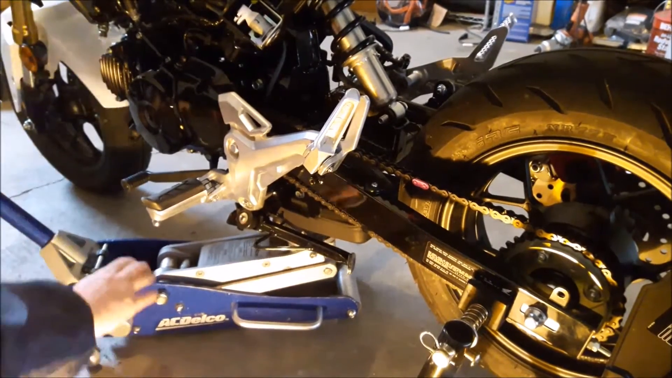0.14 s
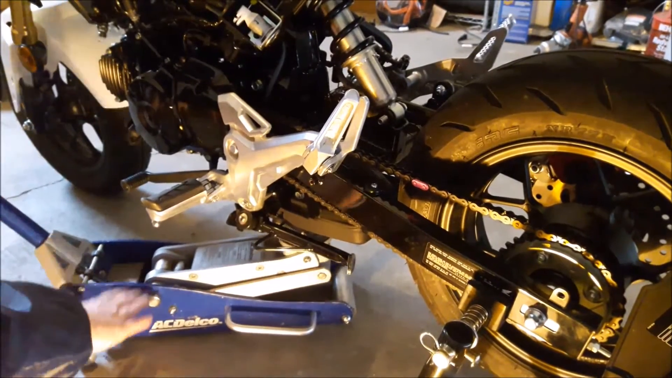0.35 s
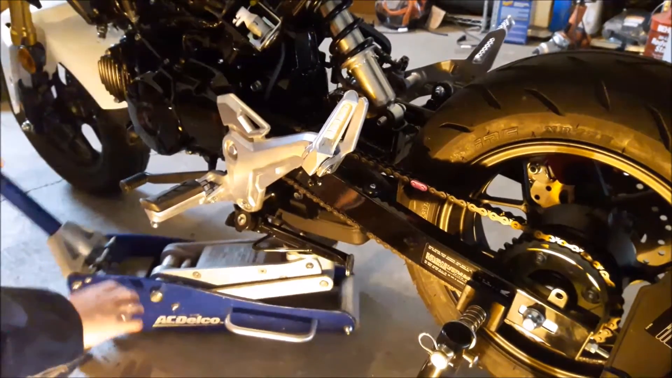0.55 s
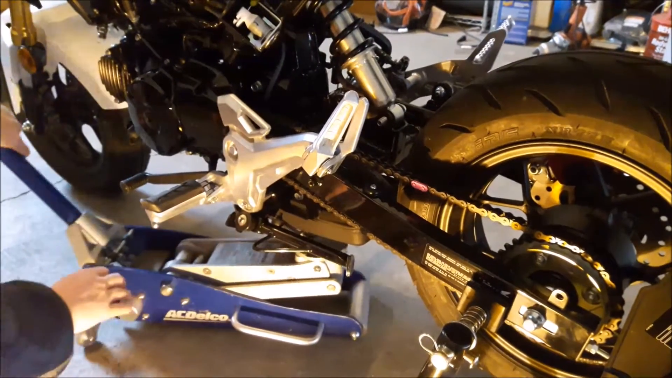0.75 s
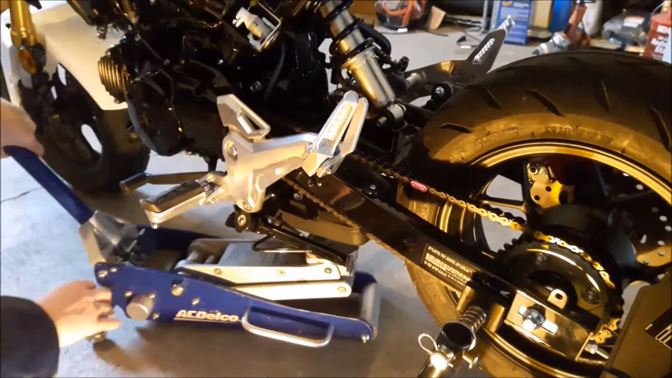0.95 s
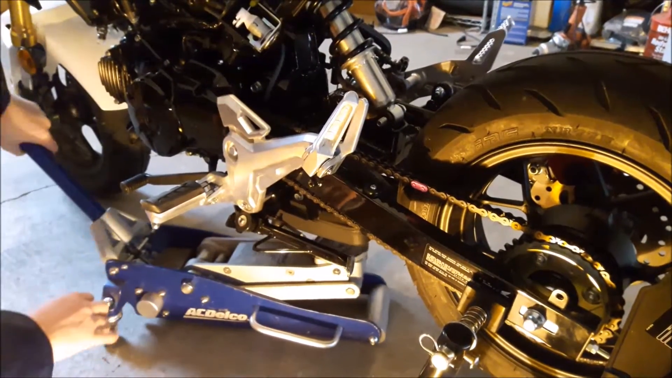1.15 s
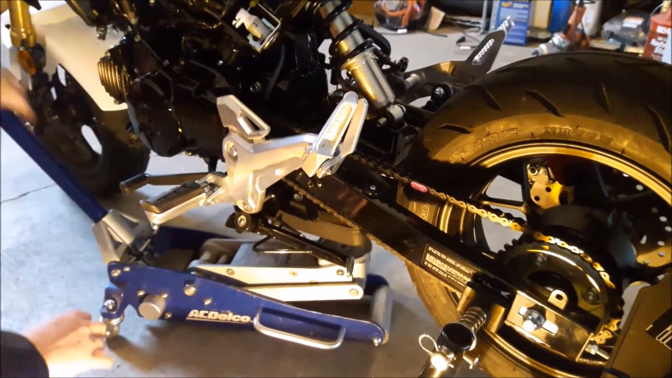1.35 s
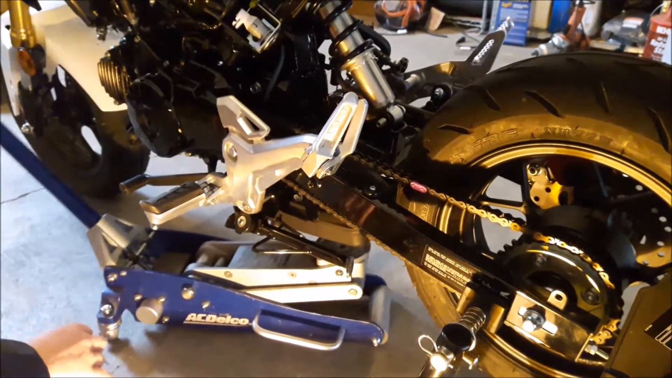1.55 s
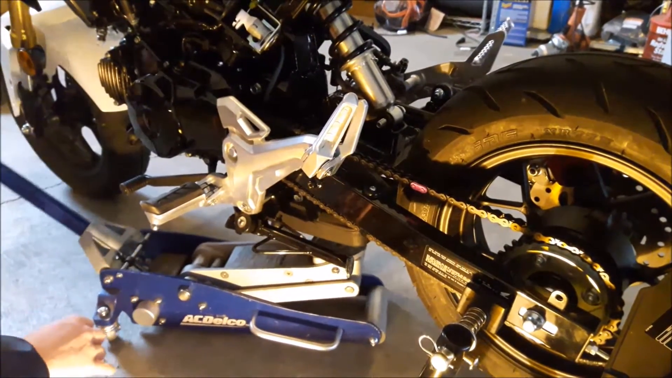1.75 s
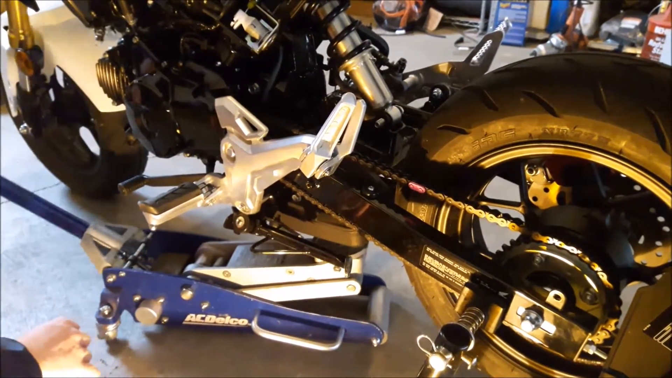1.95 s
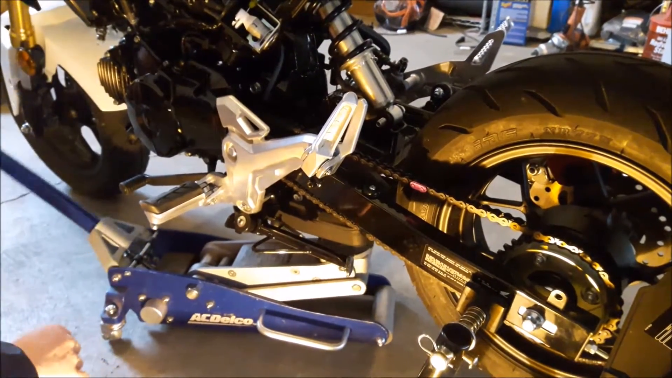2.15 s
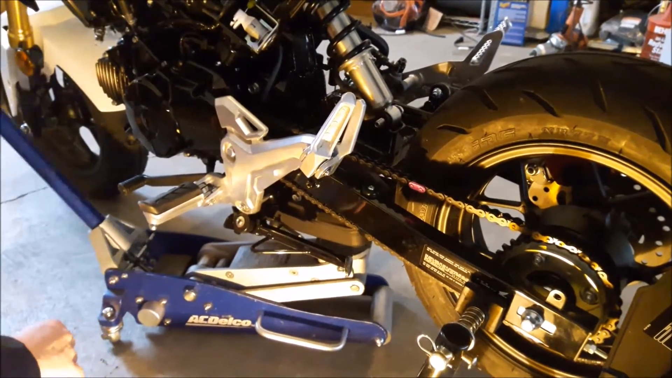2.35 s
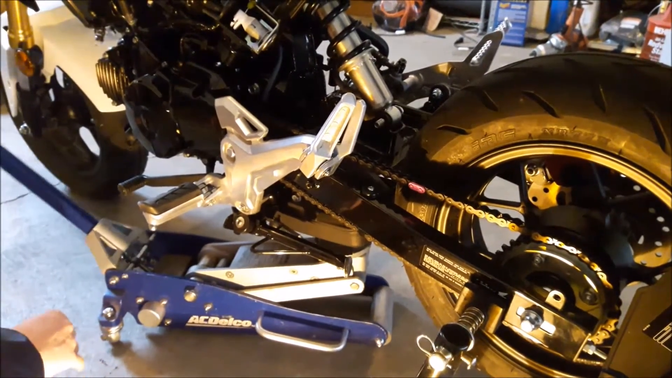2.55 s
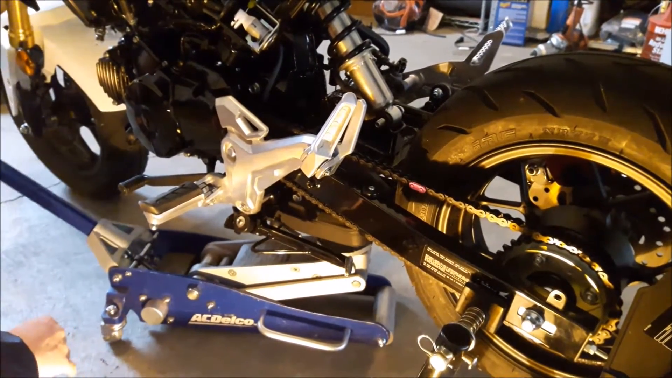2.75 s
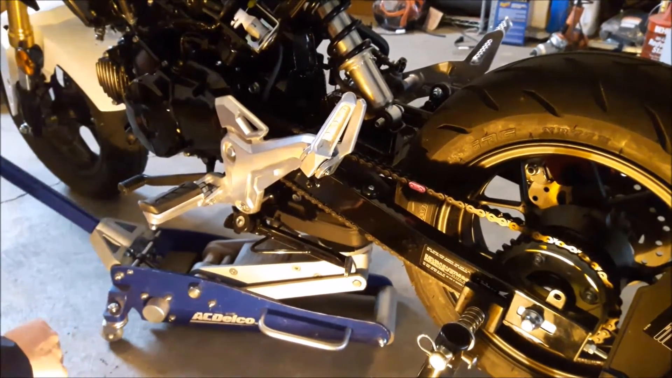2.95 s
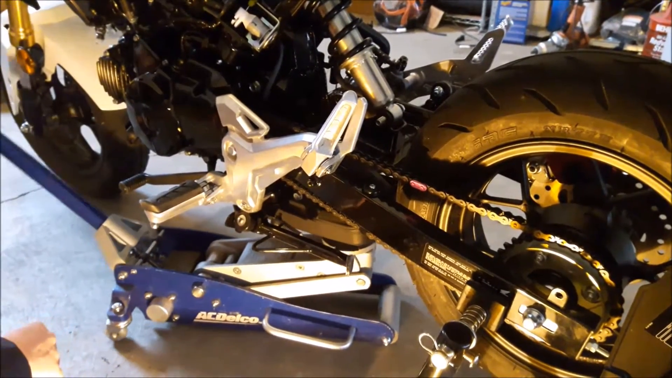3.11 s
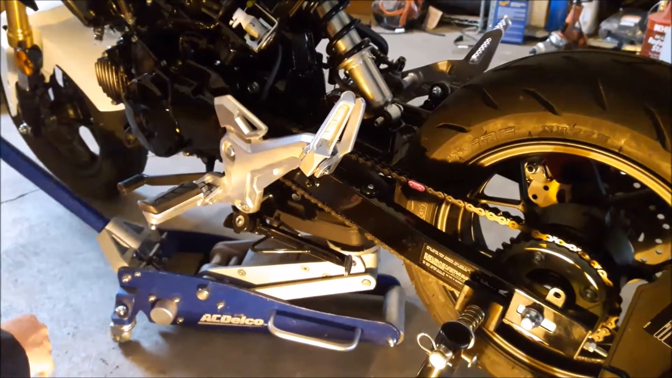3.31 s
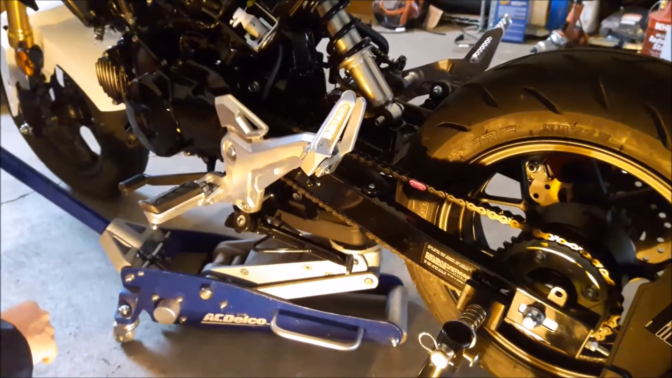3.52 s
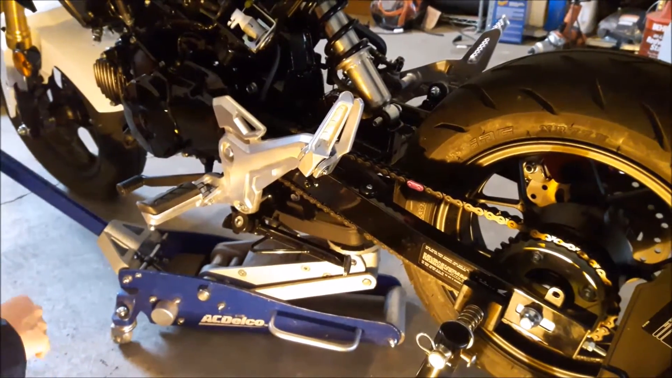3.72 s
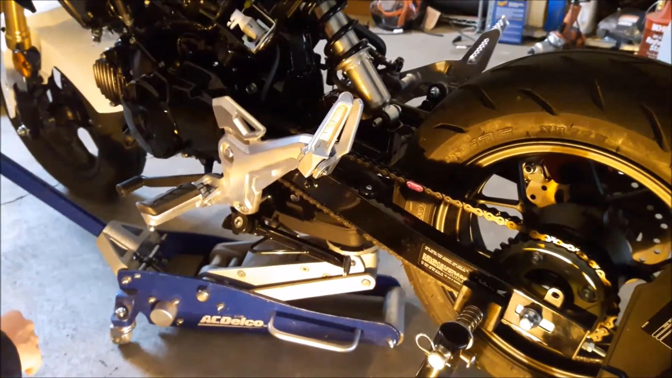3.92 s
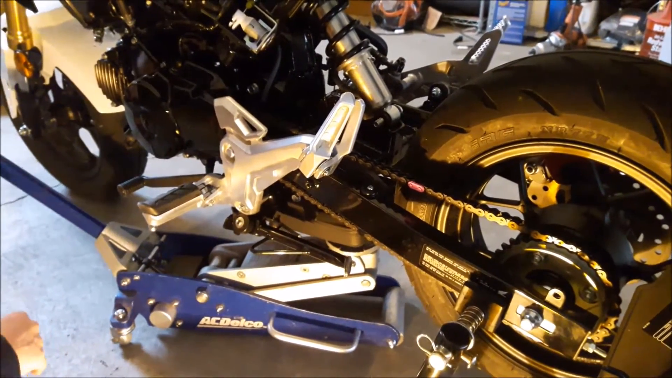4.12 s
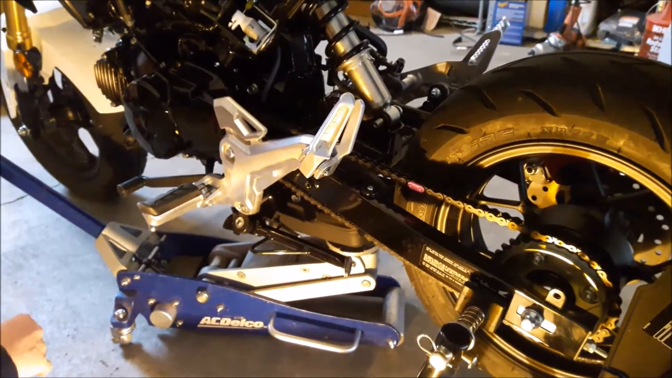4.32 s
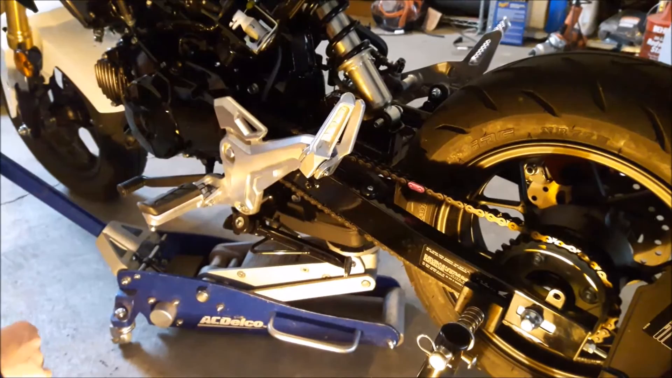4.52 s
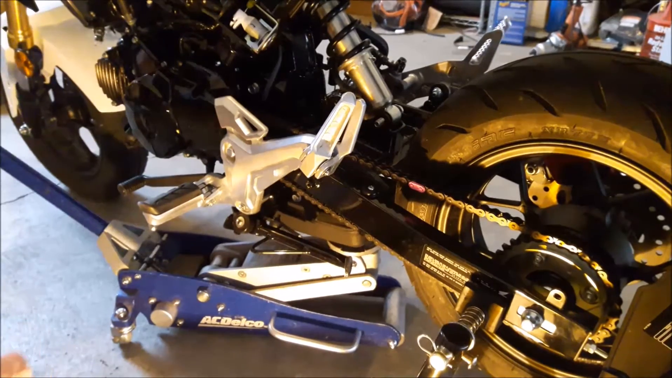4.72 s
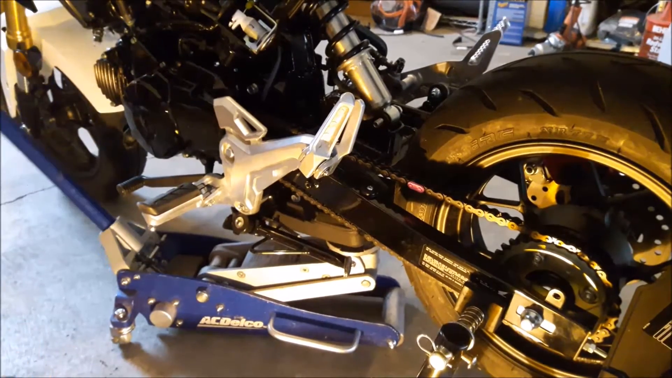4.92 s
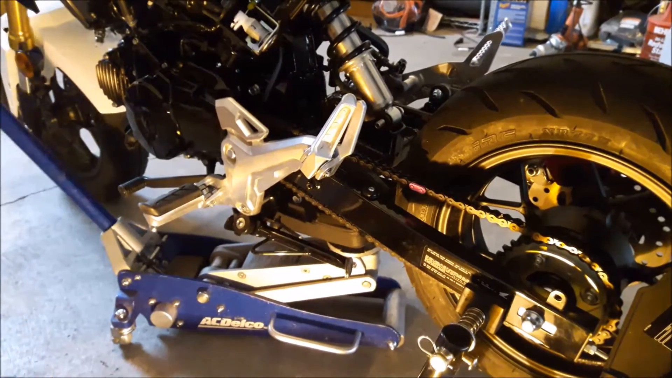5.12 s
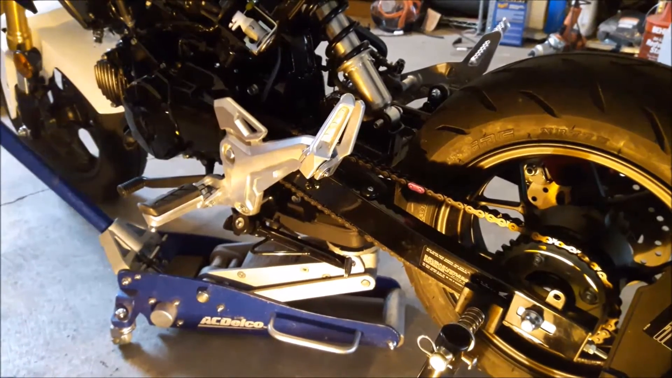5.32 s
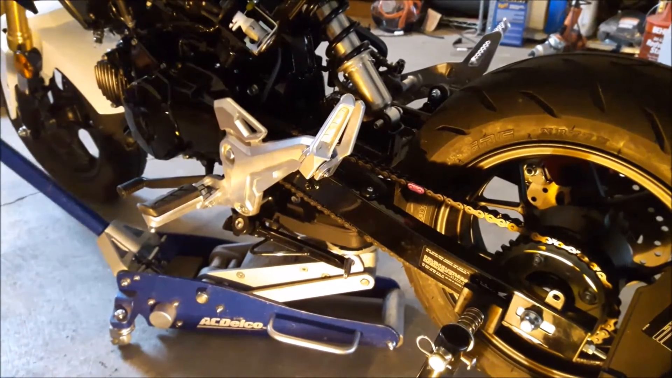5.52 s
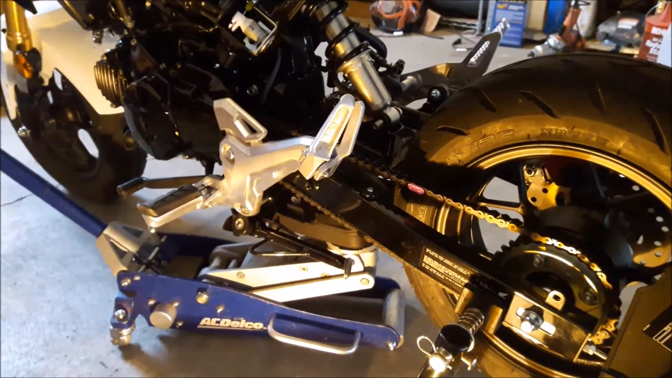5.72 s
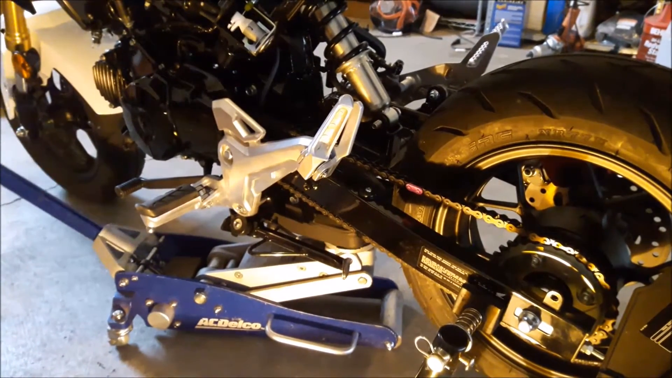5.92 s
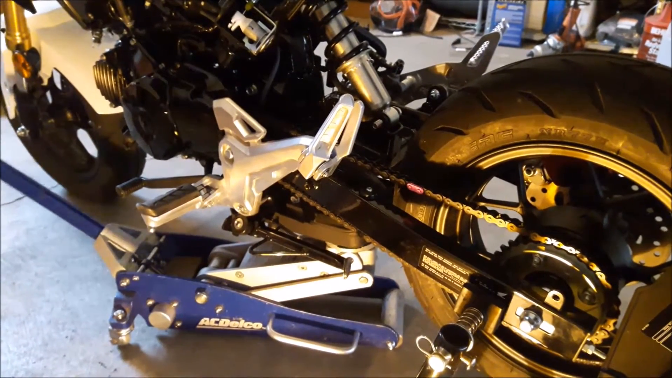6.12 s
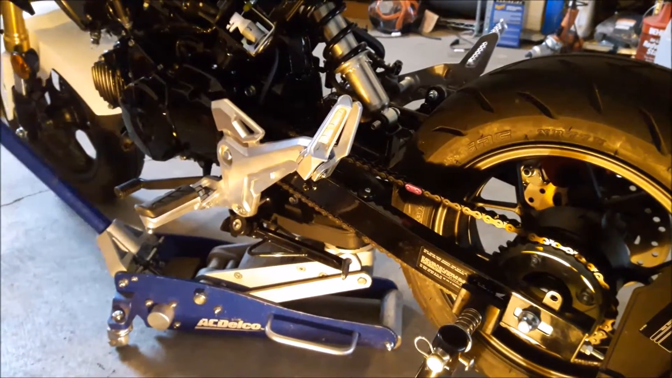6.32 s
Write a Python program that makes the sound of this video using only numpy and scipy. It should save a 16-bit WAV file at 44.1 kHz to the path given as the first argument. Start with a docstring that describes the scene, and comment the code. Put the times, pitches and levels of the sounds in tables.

```python
"""In a small hard garage a steel floor jack is rolled over concrete under a motorcycle, then pumped.
First a caster scuffs and the wheels rumble and grind, made of filtered noise and tiny impacts; the dry axle
sings and squeals as unsteady high tones, and the frame knocks as short bursts of force ring its resonances.
Then the handle clunks in its socket in the same way, while the pivot scrapes and squeaks, the chassis booms
and the ram slides faintly. Air murmurs throughout, and dense reflections ring after every sound of the jack."""
import sys
import numpy as np
from scipy import signal
from scipy.fft import rfft, irfft
from scipy.io import wavfile

SR = 44100
rng = np.random.default_rng(int(sys.argv[2]) if len(sys.argv) > 2 else 0)


def log_audio(samples):
    """Write samples as a 16-bit WAV file to the path given in sys.argv[1]."""
    # one column per channel
    frames = np.atleast_2d(samples).T
    # limit to full scale, then quantise
    limited = np.clip(frames, -1, 1)
    pcm = np.round(limited * 32767).astype(np.int16)
    wavfile.write(sys.argv[1], SR, pcm)


N = 284828  # length in samples
TIME = np.arange(N) / SR  # seconds


def amp(db):
    """Decibels to gain."""
    return 10 ** (np.asarray(db) / 20)


def unit(x):
    """Scales a sound to an rms of 1."""
    return x / np.sqrt(np.mean(x ** 2) + 1e-20)


def read(points, hz):
    """Reads a table of (Hz, value) between its rows, on a log-frequency axis."""
    table_hz, value = np.transpose(points)
    return np.interp(np.log(hz + 1), np.log(table_hz + 1), value)


def follow(s, db):
    """Gain along a level curve, silent outside it."""
    gate = np.interp(TIME, [s[0] - .01, s[0], s[-1], s[-1] + 0.021], [0, 1, 1, 0])
    return amp(np.interp(TIME, s, db)) * gate


def add(mix, s, sound):
    """Mixes a sound in at a time in seconds."""
    part = mix[max(0, round(s * SR)):][:len(sound)]
    part += sound[:len(part)]


def colour(x, points):
    """Filters a sound to the given spectrum without any response before the sound itself."""
    gain_db = np.maximum(read(points, abs(np.fft.fftfreq(4096, 1 / SR))), -100)
    log_gain = np.log(amp(gain_db))
    # this phase gathers the response as early as possible
    response = np.exp(np.conj(signal.hilbert(log_gain)))
    taps = np.fft.ifft(response).real[:2048]
    return signal.oaconvolve(x, taps)[:len(x)]


def resonate(x, hz, width):
    """One resonance of gain 1 at its centre; a narrower width in Hz rings longer."""
    r = np.exp(-np.pi * abs(width) / SR)
    return signal.lfilter([1 - r, 0, r - 1], [1, -2 * r * np.cos(2 * np.pi * hz / SR), r * r], x)


def ring(x, modes):
    """The resonances of a steel part answering a force."""
    return sum(amp(db) * resonate(x, hz, width) for hz, width, db in modes)


def wander(size, hz):
    """Smooth random drift with an rms of 1, slower for a lower Hz."""
    f = np.fft.rfftfreq(size, 1 / SR)
    spectrum = rfft(rng.standard_normal(size))
    return unit(irfft(spectrum * np.exp(-(f / hz) ** 2), size))


def friction(clump_db, clump_hz):
    """Countless tiny contacts that come in clumps."""
    return unit(rng.standard_normal(N) * amp(clump_db * wander(N, clump_hz)))


def chatter(decay, rise, order=4096):
    """A brief volley of contacts with a nearly even spectrum and an energy of 1."""
    t = np.arange(order) / SR
    shape = (1 - np.exp(-(t / rise) ** 2)) * np.exp(-t / max(decay, .001))
    volley = rng.standard_normal(order) * shape
    # level the spectrum, then shape it in time again
    for _ in range(2):
        z = rfft(volley)
        volley = irfft(z / (abs(z) + 1e-12)) * np.sqrt(shape)
    return volley / np.linalg.norm(volley)


def grains(per_s, spread_db, decay):
    """Separate tiny impacts of random size, each with one of four random volleys."""
    struck = rng.random(N) < per_s / SR
    sizes = amp(spread_db * np.minimum(rng.exponential(1, N), 3.5)) * struck
    kind = rng.integers(0, 4, N)
    volleys = [signal.oaconvolve(sizes * (kind == k), chatter(decay, 0.00047))[:N] for k in np.unique(kind)]
    return unit(sum(volleys))


# How alike left and right are. Each row: frequency in Hz, likeness from 0 to 1.
SAME = [(60, 0.88), (130, 1), (290, 0.9), (640, 0.69), (1410, 0), (3100, 0), (6820, 0.44), (15000, 0.05)]


def pair(a, b, spread=2):
    """Two unrelated signals become a field at two microphones: alike in the bass, less so the wider it spreads."""
    same = np.clip(read(SAME, np.fft.rfftfreq(len(a), 1 / SR)), .05, 1) ** abs(spread)
    right = irfft(same * rfft(a) + np.sqrt(1 - same ** 2) * rfft(b), len(a))
    return np.array([a, right])


# Spectrum of the murmur of the air. Each row: frequency in Hz, relative level in dB.
AIR = [(21, -61.5), (35, -38.5), (54, -15.5), (90, -12.5), (123, 0.5), (147, -13.5), (216, -10),
       (279, -13.5), (379, -16.5), (650, -21), (778, -17.5), (979, -25.5), (1440, -24.5), (5180, -45),
       (16000, -51)]
AIR_DB = -57.5  # before the trim by level_db
# Low resonances of the room. Each row: frequency in Hz, width in Hz, level in dB before the trim.
DRONE = [(127, 23, -76), (160.4, 6.8, -67), (207, 95, -72), (334, 34, -73.5)]


def air(level_db=-2, drone_db=-1, right_db=-2.5):
    """Steady background murmur of the air, as filtered noise, with the low resonances of the room."""
    murmur = pair(*(unit(colour(rng.standard_normal(N), AIR)) for _ in range(2)))
    noise = rng.standard_normal(N)
    drone = np.zeros(N)
    for hz, width, db in DRONE:
        # two passes at double width make steeper sides
        once = resonate(noise, hz, 2 * width)
        drone += amp(db) * unit(resonate(once, hz, 2 * width))
    return (amp(AIR_DB + level_db) * murmur + amp(drone_db) * drone) * amp([[0], [right_db]])


# How long the garage rings. Each row: frequency in Hz, seconds to die away by 60 dB.
GARAGE = [(120, 0.77), (300, 1), (700, 0.91), (1500, 0.78), (3000, 0.79), (5000, 0.79), (7500, 0.5),
          (14000, 0.73)]


def tails(build):
    """Dense reflections that build up quickly and die by band, for two microphones."""
    t = np.arange(SR) / SR
    hz, when, z = signal.stft(rng.standard_normal((2, SR)), SR, nperseg=256)
    fade = amp(-60 * when / read(GARAGE, hz)[:, None])
    echo = signal.istft(z * fade, SR, nperseg=256)[1][:, :SR]
    echo = pair(*(echo * (1 - np.exp(-(t / build) ** 2))))
    return echo / np.linalg.norm(echo[0])


def garage(x, build=0.0072, shift_hz=1.3, count=3):
    """Sounds come from changing places on the jack, so their pattern of reflections keeps changing."""
    room = np.zeros((2, N))
    for k in range(count):
        share = np.sqrt(2 / count) * np.cos(2 * np.pi * shift_hz * TIME + np.pi * k / count)
        room += signal.fftconvolve((x * share)[None], tails(build), axes=1)[:, :N]
    return room


# The jack is shoved into place. Each row: time in seconds, rumble in dB, grinding in dB, both before trims.
ROLL = [(0, -52, -62), (.08, -68, -63), (.13, -53, -47), (.26, -50.5, -53), (.42, -50.5, -53),
        (.49, -54, -49), (.55, -43.5, -40), (.68, -35, -41.5), (.78, -60, -48.5), (.85, -55.5, -53),
        (1.1, -46, -48.5), (1.22, -52, -61), (1.3, -55, -52.5), (1.42, -77, -67), (1.48, -68, -52)]
# Spectra of the rumble, the grinding and the cracking grit. Each row: frequency in Hz, relative level in dB.
RUMBLE = [(30, -46), (60, -27), (100, -27), (120, -7), (138, 7.5), (160, -4.5), (190, -7.5), (220, -12.5),
          (250, 0.5), (285, -6.5), (330, -11), (400, -13.5), (480, -39), (800, -60)]
GRIND = [(300, -4), (500, -5), (780, 2.5), (1000, 1.5), (1600, -1), (2400, -7.5), (3500, -31.5),
         (8000, -57.5)]
GRIT = [(1000, -31), (2500, -7.5), (4000, -9.5), (5300, -10.5), (7400, -11), (8200, -38), (15000, -37)]
# Resonances of the frame. Each row: frequency in Hz, width in Hz, dB over the plain sound.
FRAME = [(639, 70, 6.5), (965, 22, 16.5), (1160, 14, 7), (1380, 78, 0.5), (1689, 37, 9.5), (1994, 65, 1),
         (2735, 44, 0), (2942, 28, 5), (3896, 48, 0), (3610, 48, -3), (5370, 33, 4)]


def wheels(rumble_db=-2, grind_db=-1, grit_db=-12, ring_db=-6):
    """Steel wheels on concrete: bumps rumble, grains of grit crack and ring the frame."""
    s, rumble, grind = np.transpose(ROLL)
    low = unit(colour(friction(2.5, 46), RUMBLE)) * follow(s, rumble + rumble_db)
    mid = colour(friction(3.8, 65), GRIND)
    mid = unit(mid + amp(ring_db) * ring(mid, FRAME)) * follow(s, grind + grind_db)
    high = colour(grains(per_s=450, spread_db=-2.5, decay=0.002), GRIT)
    high = unit(high + ring(high, FRAME)) * follow(s, grind + grit_db)
    return low + mid + high


# Partials of a squeal. Each row: multiple of the pitch, relative level in dB.
SQUEAL_PARTIALS = [(0.999, 12.5), (1.836, -13.5), (2.277, -17)]


def whistle(hz, waver=0.007, flutter_db=3):
    """Stick and slip holds one high, unsteady note with inharmonic partials."""
    size = max(len(hz), SR)
    turns = np.cumsum(hz * (1 + waver * wander(size, 200)[:len(hz)])) / SR
    tone = sum(amp(db) * np.sin(2 * np.pi * k * turns) for k, db in SQUEAL_PARTIALS)
    return unit(tone * amp(flutter_db * wander(size, 55)[:len(hz)]))


# Squeals of dry steel. Each row: start in seconds, length in seconds, settled pitch in Hz, relative level in dB.
SQUEALS = [(0.691, 0.057, 6615, -57.5), (0.862, .08, 6530, -64), (0.972, 0.087, 6520, -59),
           (1.242, 0.016, 6500, -64.5), (2.509, .11, 4560, -61.5), (3.301, .016, 6600, -61.5),
           (3.358, 0.042, 6490, -58.5)]
CATCH_HZ, CATCH_S = 116, 0.026  # a squeal starts this much sharp, and settles with this time constant
SQUEAL_FADE_DB_PER_S = -110
AXLE_HZ, AXLE_DB = 6540, -17  # level against the grinding of the wheels


def squeal(level_db=14.0):
    """A dry axle sings faintly while the wheels roll; now and then the steel catches and squeals aloud."""
    s, _, grind = np.transpose(ROLL)
    out = follow(s, grind + AXLE_DB) * whistle(np.full(N, AXLE_HZ), waver=0.0089, flutter_db=5.5)
    for s, length, hz, db in SQUEALS:
        t = np.arange(0, length, 1 / SR)
        level = amp(db + level_db + SQUEAL_FADE_DB_PER_S * t) * signal.windows.tukey(len(t), .15)
        add(out, s, level * whistle(hz + CATCH_HZ * np.exp(-t / CATCH_S)))
    return out


# The handle turns round and takes up the load. Each row: start in seconds, length in seconds,
# then relative levels in dB of the scrape, the squeak and the shudder of the chassis.
STROKES = [(1.499, 0.068, -45.5, -78, -53.5), (2.381, 0.085, -48.5, -59, -46.5),
           (3.26, 0.14, -47, -76, -52), (3.956, 0.066, -54, -83, -67), (5.011, 0.1, -49.5, -65, -49.5)]
SHUDDER_HZ, SHUDDER_S, SHUDDER_LAG_S = 147.4, 0.055, 0.01753  # pitch, length, delay after the stroke starts


def chassis(overtone=1.85, overtone_db=-11, level_db=5.0):
    """At each stroke the whole jack shudders on its wheels for a few cycles."""
    out, t = np.zeros(N), np.arange(0, SHUDDER_S, 1 / SR)
    shudder = np.sin(2 * np.pi * SHUDDER_HZ * t)
    shudder += amp(overtone_db) * np.sin(2 * np.pi * SHUDDER_HZ * overtone * t)
    shudder = unit(shudder * np.sin(np.pi * t / SHUDDER_S))
    for s, *_, db in STROKES:
        add(out, s + SHUDDER_LAG_S, amp(db + level_db) * shudder)
    return out


# The dry pivot slips once more after a stroke. Each row: start in seconds, relative level in dB.
SLIPS = [(1.659, -51), (2.514, -45), (5.194, -62)]
SLIP_RISE_S, SLIP_DECAY_S = 0.0017, 0.049
SLIP_SCRAPE_DB = -6  # scrape against the level of the slip
# A caster swivels and scuffs. Each row: start in seconds, length in seconds, relative final level in dB.
SCUFFS = [(0, 0.13, -48.5), (1.927, 0.098, -50)]
SCUFF_SWELL_DB = 10  # rise from start to end
# The ram slides under load. Each row: time in seconds, relative level in dB.
SLIDE = [(3.55, -80), (3.9, -60), (4.2, -69), (4.5, -67), (4.7, -69), (5.0, -63)]
# Spectrum of scraping steel. Each row: frequency in Hz, relative level in dB.
SCRAPE = [(120, -4.5), (250, 0.5), (350, 8), (480, -8), (700, 2.5), (950, 1), (2000, 0), (2850, 0),
          (3600, -2), (4750, -3.5), (5700, -18), (7400, -3.5), (8100, -23), (9200, -13), (15000, -55)]
# Resonances of the handle. Each row: frequency in Hz, width in Hz, dB over the plain sound.
HANDLE = [(633, 17.5, 3.5), (773, 3.2, 2), (962, 110, 0), (1150, 78, 2.5), (1444, 110, 3), (1690, 99, -5),
          (1964, 53, 2), (2354, 7.9, 5.5), (2580, 130, -2.5), (4560, 110, -23), (6780, 160, -25)]
# Squeaking modes. Each row: frequency in Hz, typical pitch drift in Hz, relative level in dB.
PIVOT = [(4560, 73, -9), (6980, 38.7, -6), (7700, 56, -17), (7320, 240, -4)]
SQUEAK_FLUTTER_DB = 6  # rms


def pivot(scrape_db=2.0, squeak_db=-2, slide_db=-3):
    """The handle scrapes in small jerks and squeaks as it turns; the ram slides faintly, and a caster scuffs."""
    rub, squeak = np.zeros(N), np.zeros(N)
    for s, length, db, shrill_db, _ in STROKES:
        stroke = signal.windows.tukey(int(length * SR), .2)
        add(rub, s, amp(db + scrape_db) * stroke)
        add(squeak, s, amp(shrill_db + squeak_db) * stroke)
    slip = np.minimum(TIME / SLIP_RISE_S, 1) * np.exp(-TIME / SLIP_DECAY_S)
    for s, db in SLIPS:
        add(rub, s, amp(db + SLIP_SCRAPE_DB) * slip)
        add(squeak, s, amp(db + squeak_db) * slip)
    for s, length, db in SCUFFS:
        rub = rub + follow([s, s + length], [db - SCUFF_SWELL_DB, db])
    s, db = np.transpose(SLIDE)
    rasp = rub * grains(per_s=600, spread_db=-1.0, decay=0.0006)
    rasp = rasp + follow(s, db + slide_db) * friction(3.7, 100)
    steel = colour(rasp, SCRAPE)
    # ringing and colour leave the overall level of the rasp as it was
    steel = unit(steel + ring(steel, HANDLE)) * np.std(rasp)
    # each squeaking mode is driven steadily by the slip and wavers in pitch and strength
    shrill = np.zeros(N)
    for hz, width, db in PIVOT:
        flutter = amp(db + SQUEAK_FLUTTER_DB * wander(N, 74))
        turns = np.cumsum(hz + width * wander(N, 187.8)) / SR
        shrill += flutter * np.sin(2 * np.pi * turns)
    return steel + squeak * unit(shrill)


# Thin, bright snaps of dry steel letting go. Each row: start in seconds, relative level in dB.
SNAPS = [(0.181, -50.5), (1.513, -56.5), (2.0963, -50), (2.3955, -54.5), (2.518, -56), (3.174, -58.5),
         (3.2763, -52), (5.028, -56.5)]
CATCH_SNAP_DB = -4  # snap at the start of every squeal, against that squeal's table level
# Spectrum of a snap. Each row: frequency in Hz, relative level in dB.
SNAP = [(1500, -55), (4000, -41), (6000, -1), (7500, 10), (8100, 1), (9300, 3), (15000, -14)]


def snaps(decay=0.0068, rise=0.00046, level_db=0):
    """Stuck steel breaks free with a thin tick, some of them at the start of a squeal."""
    out = np.zeros(N)
    catches = [(s, db + CATCH_SNAP_DB) for s, _, _, db in SQUEALS]
    for s, db in list(SNAPS) + catches:
        add(out, s, amp(db + level_db) * np.sqrt(decay * SR) * chatter(decay, rise))
    return colour(out, SNAP)


# Spectrum of a contact. Each row: frequency in Hz, dB of a dull blow, dB of a hard one.
CONTACT = [(650, -1, 1), (1137, -2, 1), (2220, -13, 4), (4240, -29, -3), (6800, -60.5, -3.5),
           (10460, -58.5, -40)]
# Bass weight counts fully up to the first frequency in Hz and not at all from the second.
HEAVY_HZ = [600, 1200]
# Colour common to all blows. Each row: frequency in Hz, relative level in dB.
STEEL = [(80, -28), (250, 6.5), (450, -7.5), (650, 1), (900, -2), (1200, 1), (2000, 1.5), (3050, 4),
         (3450, 1), (4900, 4), (5600, -1.5), (7500, 1.5), (8100, -10.5), (9200, 6), (15000, 2)]


def blows(rows, modes, level_db, rise, decay, rattle_db, rattle_s, main_db, main_width, count=4):
    """A blow is a brief chatter that rings the steel, brighter the harder it is; loose parts rebound after it."""
    force = np.zeros((2, N))
    scale = SR * np.sqrt(.012 / 2000)  # brings chatter of energy 1 to the level of the tables
    hz, dull, hard = np.transpose(CONTACT)
    heavy = np.interp(hz, HEAVY_HZ, [1, 0])
    for s, db, hardness, weight_db, main_hz in rows:
        tone = list(zip(hz, db + dull + hardness * (hard - dull) + weight_db * heavy))
        rebounds = np.cumsum(abs(rattle_s) * (.5 + rng.random(count)))
        for side in force:  # each face of the jack sends out its own chatter
            blow = np.zeros(SR // 5)
            add(blow, 0, chatter(decay, rise))
            for k, wait in enumerate(rebounds):
                add(blow, wait, amp(rattle_db) / np.sqrt(k + 1) * chatter(0.0044, 0.000075))
            blow = colour(blow, tone)
            # the place of contact favours one resonance
            add(side, s, blow + amp(main_db) * resonate(blow, main_hz, main_width * main_hz))
    force = [amp(level_db) * scale * colour(side, STEEL) for side in force]
    return pair(*(side + ring(side, modes) for side in force), spread=0.98)


# Knocks of the frame and casters. Each row: start in seconds, relative strength in dB, hardness from 0 to 1,
# extra weight in the bass in dB, main ring in Hz.
KNOCKS = [(0.021, -53.5, .1, -22, 2030), (0.1025, -50, 0.82, 0, 1620), (0.1195, -36, 0.62, -11.5, 1600),
          (0.1798, -43.5, 1, -13, 5200), (0.4875, -58.5, 0.9, 5, 5140), (0.5445, -53.5, 0.91, 9, 5150),
          (0.5885, -55.5, 1, 0, 5100), (0.6413, -48, 0.99, 3, 2600), (0.759, -36.5, 0, -24, 1800),
          (0.8405, -38, .1, -32, 2330), (0.8675, -57, 1, 6, 5900), (1.0205, -57.5, 1, -7, 5940),
          (1.061, -37.5, 0.67, -21, 3750), (1.0835, -47, 0.6, -6, 2980), (1.276, -39.5, 0.49, -17.5, 1870),
          (1.469, -51, 0, -12, 1690), (1.996, -38, .35, -15, 2030), (2.0145, -36.5, .7, -12, 3620),
          (2.0963, -52, 1, -12, 7200)]


def knocks():
    """Blows on the frame and casters ring the resonances of the frame."""
    return blows(KNOCKS, FRAME, level_db=-1.5, rise=0.0015, decay=0.01,
                 rattle_db=-25, rattle_s=0.02, main_db=3, main_width=0.051)


# Clunks of the handle in its socket. Each row: start in seconds, relative strength in dB, hardness from 0 to 1,
# extra weight in the bass in dB, main ring in Hz.
CLUNKS = [(1.502, -37, 0.12, -14, 1720), (1.512, -45, 0.45, -1, 1730), (1.551, -37, 0.4, 0, 1690),
          (1.5998, -50.5, 0.9, 4.5, 1470), (1.6695, -42.5, 0.86, -19, 1700), (1.6965, -47, 0.78, 3, 1790),
          (2.3955, -42, 0.73, -6, 1690), (2.4653, -32.5, 0.16, -6.5, 1870),
          (2.5247, -45.5, 0.81, 2.5, 4320), (2.9978, -49.5, 0.98, -4.5, 1820), (3.167, -53, 0.36, -1, 980),
          (3.2763, -42, 0.85, -1, 3900), (3.3255, -40.5, 0, -0.5, 1850), (3.373, -39.5, 0, -7.5, 1150),
          (3.725, -65.5, 0.88, 6, 2720), (3.8495, -52.5, .25, -21, 1160), (3.9625, -44.5, 0.5, 3, 1380),
          (4.0643, -48.5, 0.81, -13, 2470), (4.514, -58, 0.25, -2, 1310), (4.6855, -55, 0, -15, 1180),
          (5.0278, -46.5, 0.73, -3, 2720), (5.1485, -39, 0.24, -3, 1160), (5.205, -38.5, 0.64, -2, 1720),
          (6.1853, -50, 1, -7, 1650)]


def clunks():
    """The handle strikes its socket and rings in its own resonances."""
    return blows(CLUNKS, HANDLE, level_db=-2.0, rise=0.0009, decay=0.01,
                 rattle_db=-15.0, rattle_s=.018, main_db=-4.0, main_width=0.12)


# Right side against left. Each row: frequency in Hz, difference in dB.
FAR_SIDE = [(100, -3.5), (250, -1.5), (500, -2.5), (1000, -6), (2000, -6), (4000, -9.5), (8000, -1),
            (14000, 0)]


def scene(blow_wet_db=-1.5, rub_wet_db=-1, boom_wet_db=-5, squeal_wet_db=-4, right_wet_db=1.0):
    """The jack lies left of the microphones, so the right one hears it later and weaker."""
    hits = knocks() + clunks() + pair(snaps(), snaps())
    rubs, booms, squeals = wheels() + pivot(), chassis(), squeal()
    near = hits + rubs + booms + squeals
    to_room = amp(blow_wet_db) * hits[0] + amp(rub_wet_db) * rubs
    to_room = to_room + amp(boom_wet_db) * booms + amp(squeal_wet_db) * squeals
    room = garage(to_room)
    late = np.pad(near[1], (3, 0))[:N]  # three samples later
    left = near[0] + room[0]
    right = colour(late + amp(right_wet_db) * room[1], FAR_SIDE)
    return np.array([left, right]) + air()


EDGE_HZ = 15900


def record(dry):
    """A steep low-pass filter takes away the very highest treble."""
    taps = signal.firwin(511, EDGE_HZ, window=("kaiser", 9), fs=SR)
    return signal.oaconvolve(dry, taps[None], "same")


dry = scene()
out = record(dry)
log_audio(out)
```